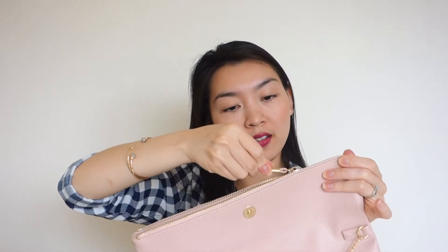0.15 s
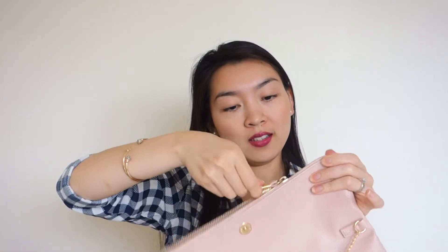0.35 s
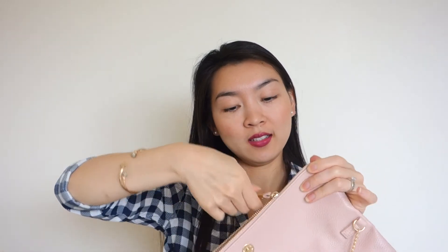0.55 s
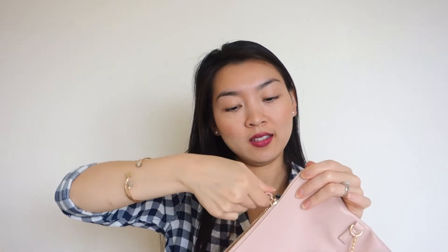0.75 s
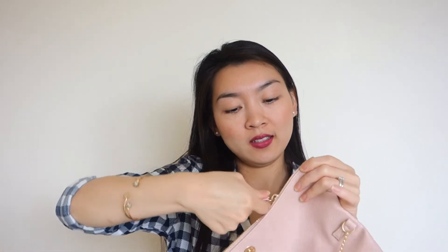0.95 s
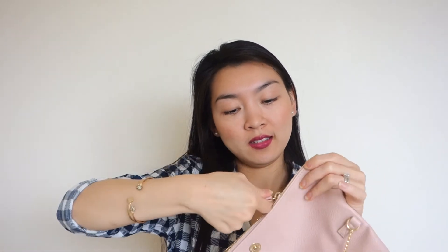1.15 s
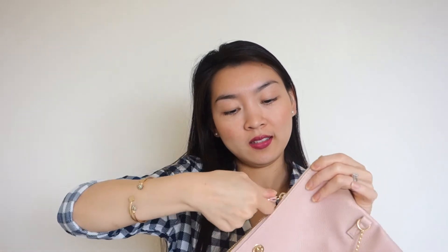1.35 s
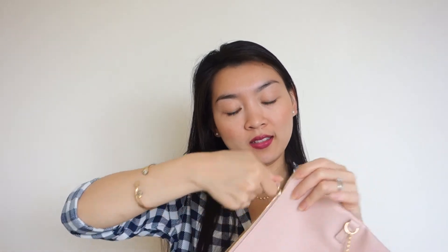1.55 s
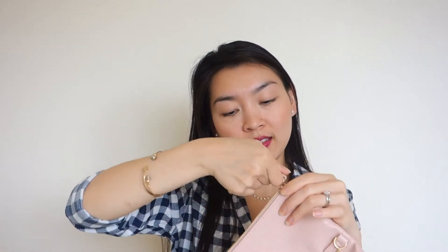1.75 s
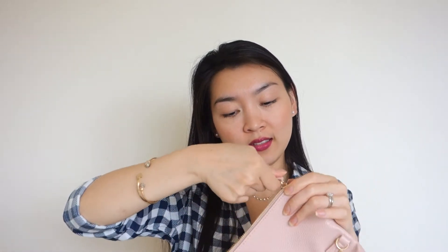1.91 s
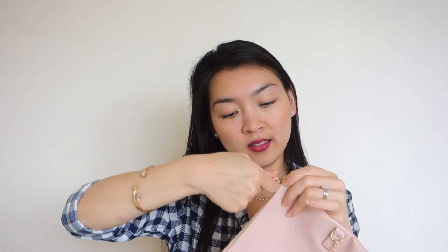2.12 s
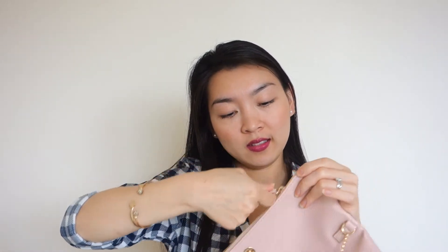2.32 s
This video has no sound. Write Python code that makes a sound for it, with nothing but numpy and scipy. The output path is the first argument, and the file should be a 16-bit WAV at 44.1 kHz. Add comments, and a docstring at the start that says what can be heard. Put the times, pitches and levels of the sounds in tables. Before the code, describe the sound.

Faint, halting scrapes of a small zipper being closed, with ticks and rubbing leather.

```python
"""A small metal zipper on a leather clutch bag is rubbed shut in short strokes, in a bare room.
From the start the teeth scrape and ring, while the leather rubs under the hand.
Soon the pull tab chinks; then, now and again, a tooth catches with a tick or the bag is nudged.
At about 1.5 s the hand bears down and the hollow bag rumbles.
Near the end it bears down again, and a panel of the bag booms as it shifts."""
import sys
import numpy as np
from scipy import signal
from scipy.fft import rfft, irfft
from scipy.io import wavfile

SR = 44100
rng = np.random.default_rng(int(sys.argv[2]) if len(sys.argv) > 2 else 0)


def output_pcm(signal):
    """Save a mono or channel-first signal as 16-bit PCM at the path in sys.argv[1].

    Samples are clipped to [-1, 1] before scaling.
    """
    pcm = np.clip(np.atleast_2d(signal).T, -1, 1) * 32767
    wavfile.write(sys.argv[1], SR, np.round(pcm).astype(np.int16))


N = 104737
TIME = np.arange(N) / SR
PADDED = 2 ** 18  # samples, with spare space for filters to ring out
FREQS = np.maximum(np.arange(PADDED // 2 + 1) * SR / PADDED, 1)

# strokes of the zipper: time_s, scrape_db, treble_db
STROKES = [(0.0, -40, -48.5), (0.09, -47, -70), (0.12, -48, -74), (0.24, -45, -54.5), (0.28, -40.5, -59),
           (0.33, -43, -56.5), (0.34, -42.5, -72), (0.4, -39.5, -55), (0.45, -46.5, -72),
           (0.46, -45.5, -55), (0.57, -53, -72), (0.62, -55, -73), (0.7, -46.5, -62), (0.74, -51.5, -70),
           (0.85, -49.5, -62.5), (0.88, -45, -55.5), (0.9, -39, -48.5), (1.06, -50, -70),
           (1.08, -47.5, -64), (1.14, -53.5, -70), (1.23, -44.5, -60), (1.3, -43.5, -53.5),
           (1.35, -48, -74), (1.39, -52.5, -65), (1.42, -53.5, -66), (1.48, -41, -46.5),
           (1.53, -42.5, -45.5), (1.58, -42.5, -56), (1.62, -52, -54.5), (1.68, -48, -64),
           (1.75, -43.5, -58), (1.81, -50, -84), (1.87, -56, -73), (2.01, -56, -77), (2.05, -43.5, -56.5),
           (2.12, -42, -54.5), (2.23, -44.5, -58.5), (2.37, -53.5, -53.5)]
# tone of the scrape: pitch_hz, level_db
SCRAPE_TONE = [(200, -41.5), (500, -19), (1050, -8.5), (1450, -2), (2200, -1), (3000, 0.5), (3900, -4.5),
               (5000, -6), (6700, -7), (7800, -17), (10000, -24), (16000, -24)]
# tone of the bright bite on top of it: pitch_hz, level_db
BITE_TONE = [(1500, -24), (4000, 7.5), (7000, 8), (9000, 3.5), (11000, 0.5), (13000, -0.5), (16000, -9)]
# pitches at which the zipper rings: pitch_hz, width_hz, boost_db
ZIPPER_RINGS = [(1510, 62, 1), (1630, 15, 4.5), (1718, 14, 4), (2340, 27, 0), (2635, 20, 1.5),
                (2876, 26, 7.5), (3050, 18, -0.5), (3337, 45, 9.5), (3394, 31, 6.5), (4165, 60, 5),
                (4960, 79, 5.5), (5815, 34, 5), (6644, 110, 6), (8230, 89, 13)]
# how much the low part of the scrape stands out: time_s, boost_db
LOW_RASP = [(0, -1), (.17, 3.5), (.5, 0), (.75, -2.5), (1.0, 2), (1.25, -3), (1.8, 3.5), (2.1, -3.5),
            (2.3, 0)]
# light rubbing of the leather: time_s, level_db
RUBBING = [(0, -46), (.06, -58), (.14, -61.5), (.25, -60.5), (.42, -57), (.49, -56), (.58, -57.5),
           (.71, -67), (.75, -63), (.83, -57), (.87, -58), (.96, -55), (1.05, -63.5), (1.17, -63),
           (1.3, -66.5), (1.4, -63), (1.52, -44.5), (1.68, -54), (1.79, -58), (1.9, -67.5), (2.01, -65.5),
           (2.105, -60), (2.125, -53), (2.23, -52.5), (2.37, -41.5)]
# tone of rubbed leather: pitch_hz, level_db
LEATHER_TONE = [(50, -47), (130, -24.5), (200, -21), (300, -13), (450, -7.5), (650, 1), (850, 0.5),
                (1200, -2.5), (1700, 0.5), (2500, -5.5), (5000, -23.5), (12000, -72)]
# pitches at which the bag rings: pitch_hz, width_hz, boost_db
BAG_RINGS = [(290, 14, 7), (426, 12, 3), (522, 12, 5), (552, 12, 1), (603, 12, 1), (787, 10, 2),
             (1144, 10, 0), (1185, 10, 1)]
# the pull tab chinks: start_s, level_db, pitch_hz
CHINKS = [(0.051, -41.5, 4220), (.085, -38.5, 3340), (.448, -41.5, 3254), (.893, -40, 3368),
          (1.285, -46.5, 3395), (1.365, -58, 12500), (1.645, -42.5, 3310)]
# a tooth catches: start_s, level_db
TICKS = [(.342, -31.5), (.372, -35.5), (.461, -40.5), (.872, -32), (.879, -39), (1.072, -42), (1.251, -40),
         (1.529, -31.5), (1.603, -34.5), (2.121, -40), (2.204, -37.5)]
# the bag is nudged: start_s, level_db
NUDGES = [(.528, -44.5), (.746, -42.5), (.80, -47.5), (.864, -40.5), (1.468, -37), (1.519, -31.5),
          (1.539, -30), (2.120, -42.5)]
# tone of the hollow bag: pitch_hz, level_db
HOLLOW_TONE = [(50, -45), (130, -25.5), (200, -21.5), (290, -10), (350, -8), (430, -3.5), (550, -5.5),
               (750, -1), (1100, -7), (2000, -16.5), (5000, -18), (12000, -56)]
# the hand bears down: peak_s, level_db, rise_db_per_s, fall_db_per_s
PRESSES = [(1.515, -36.5, 250, 164), (2.3, -44, 205, 5)]
# a panel of the bag shifts: peak_s, level_db, rise_db_per_s, fall_db_per_s
PANEL_SHIFTS = [(2.32, -54.5, 330, 5)]
# tone of the room's hiss: pitch_hz, level_db
HISS_TONE = [(20, -10.5), (60, -11.5), (150, -14), (500, 2), (2000, -4.5), (16000, -26)]
# how wide the sound spreads: pitch_hz, side_minus_middle_db
STEREO_WIDTH = [(120, -23), (350, -32), (700, -12.5), (1400, -10), (2800, -8), (5600, -4), (10000, -1),
                (15000, -2.5)]
# balance of the two microphones: pitch_hz, left_minus_right_db
MIC_BALANCE = [(500, 0.5), (2800, -0.5), (5600, -1.3), (10000, -1), (14000, -5)]


def from_db(db):
    """Turn decibels into a gain to multiply by."""
    return 10 ** (np.asarray(db) / 20)


def unit_level(x):
    """Scale a sound to an average (RMS) level of 1."""
    return x / np.sqrt(np.mean(x ** 2) + 1e-20)


def curves(rows):
    """Join a table's points with straight lines, one curve per column after the time."""
    times_s, *columns = np.transpose(rows)
    return [np.interp(TIME, times_s, column) for column in columns]


def tone(points, rings=()):
    """Gain at each pitch: a broad slope with narrow ringing peaks on it."""
    hz, db = np.transpose(points)
    slope = from_db(np.interp(np.log(FREQS), np.log(hz), db))
    peaks = sum(from_db(boost) ** 2 / (1 + (2 * (FREQS - pitch) / width) ** 2)
                for pitch, width, boost in rings)
    return slope * np.sqrt(1 + 2 * peaks)


def filtered(x, gain):
    """Give a sound a tone, so that ringing comes only after each hit (minimum phase)."""
    cepstrum = irfft(np.log(gain))
    cepstrum[1:PADDED // 2] *= 2
    cepstrum[PADDED // 2 + 1:] = 0
    return irfft(rfft(x, PADDED) * np.exp(rfft(cepstrum)))[..., :N]


def resonate(x, hz, width_hz):
    """Let a sound ring at one pitch, with a gain of 1 there."""
    r = np.exp(-np.pi * width_hz / SR)
    feedback = [1, -2 * r * np.cos(2 * np.pi * hz / SR), r * r]
    return signal.lfilter(np.array([1, 0, -1]) * (1 - r * r) / 2, feedback, x)


def drift(rate_hz):
    """A slow random wobble, about 1 in size."""
    smooth = rfft(rng.standard_normal(PADDED)) / (1 + (FREQS / rate_hz) ** 2)
    return unit_level(irfft(smooth)[:N])


def contacts(per_s, spread_db):
    """Tiny random hits, mostly small, a few large."""
    sizes = from_db(spread_db * np.minimum(rng.exponential(1, N), 4))
    return sizes * rng.choice([-1, 1], N) * (rng.random(N) < per_s / SR)


def knocks(rows, decay_s, gain):
    """Short bursts of noise that ring through an object, each peaking near its own level."""
    bursts = np.zeros(N)
    for start_s, db in rows:
        age = np.maximum(TIME - start_s, 0)
        bursts += from_db(db) * (TIME >= start_s) * np.exp(-age / decay_s) * rng.standard_normal(N)
    one_knock = filtered(rng.standard_normal(N) * np.exp(-TIME / decay_s), gain)
    return filtered(bursts, gain) / np.abs(one_knock).max()


def swells(rows):
    """A gain that rises to each peak and falls away."""
    return sum(from_db(db + np.minimum(rise * (TIME - peak_s), fall * (peak_s - TIME)))
               for peak_s, db, rise, fall in rows)


def zipper_scrape(teeth_per_s=208, pulse_db=1.3, ring_db=-1.5, flicker_db=2):
    """Tiny hits pulse as teeth pass; rings swell and fade with the grip; firm strokes add bite."""
    scrape_db, treble_db = curves(STROKES)
    low_db, = curves(LOW_RASP)
    teeth_passed = np.cumsum(teeth_per_s * np.exp(0.2 * drift(rate_hz=30))) / SR
    pulse = from_db(pulse_db * np.cos(2 * np.pi * teeth_passed))
    hits = [pulse * contacts(per_s=9000, spread_db=1.5) for _ in range(2)]
    rasp, ring_drive = (unit_level(filtered(x, tone(SCRAPE_TONE))) for x in hits)
    rings = np.zeros(N)
    for hz, width_hz, boost_db in ZIPPER_RINGS:
        grip = from_db(ring_db + boost_db + flicker_db * drift(rate_hz=13))
        rings += resonate(ring_drive * grip, hz, width_hz)
    scrape = unit_level(rasp + rings)
    scrape += (from_db(low_db) - 1) * resonate(scrape, hz=1590, width_hz=300)
    bite = unit_level(filtered(pulse * contacts(per_s=8000, spread_db=2.5), tone(BITE_TONE)))
    return from_db(scrape_db - 1) * scrape + from_db(treble_db + 4.5) * bite


def leather_rub():
    """The leather sticks and slips under the hand."""
    rub_db, = curves(RUBBING)
    slips = contacts(per_s=2600, spread_db=0.5)
    return from_db(rub_db - 0.5) * unit_level(filtered(slips, tone(LEATHER_TONE, BAG_RINGS)))


def tab_chinks(rise_s=0.00091, ring_s=0.099):
    """The small metal tab is tapped and rings briefly, damped by the fingers."""
    out = np.zeros(N)
    for start_s, db, hz in CHINKS:
        age = np.maximum(TIME - start_s, 0)
        loudness = from_db(db - 60 * age / ring_s) * (1 - np.exp(-age / rise_s))
        out += loudness * np.sin(2 * np.pi * hz * age)
    return out


def tooth_ticks():
    """A tooth catches and sets the zipper ringing."""
    metal = tone(SCRAPE_TONE, ZIPPER_RINGS) + 0.92 * tone(BITE_TONE)
    return knocks(TICKS, decay_s=0.012, gain=metal)


def bag_nudges():
    """Small bumps sound both the hollow bag and its leather skin."""
    body_and_skin = tone(HOLLOW_TONE, BAG_RINGS) + 0.83 * tone(LEATHER_TONE, BAG_RINGS)
    return knocks(NUDGES, decay_s=0.0024, gain=body_and_skin)


def bag_rumble():
    """Pressed harder, the slipping leather shakes the hollow bag."""
    slips = contacts(per_s=2600, spread_db=1.4)
    return swells(PRESSES) * unit_level(filtered(slips, tone(HOLLOW_TONE, BAG_RINGS)))


def panel_boom(pitch_hz=182, width_hz=26):
    """A panel of the bag booms around one low pitch as it is shifted."""
    panel = 1 / (1 + (2 * (FREQS - pitch_hz) / width_hz) ** 2)
    return swells(PANEL_SHIFTS) * unit_level(filtered(rng.standard_normal(N), panel))


def room_echo(x, delay_s=0.004, fade_s=0.27, turns_per_s=0.902):
    """Echoes off bare walls, blending slowly between two patterns as the hands and bag move."""
    tails = rng.standard_normal((2, N)) * from_db(-60 * TIME / fade_s) * (TIME > delay_s)
    first, second = (signal.fftconvolve(x, tail / np.sqrt(np.sum(tail ** 2)))[:N] for tail in tails)
    angle = 2 * np.pi * turns_per_s * TIME
    return np.cos(angle) * first + np.sin(angle) * second


def scene(echo_db=-5.5, hiss_db=-68):
    """The bag is straight ahead; echoes widen the treble; faint room hiss lies below."""
    direct = zipper_scrape() + tooth_ticks() + tab_chinks()
    direct += leather_rub() + bag_rumble() + panel_boom() + bag_nudges()
    middle = direct + from_db(echo_db) * room_echo(direct)
    middle_gain = np.sqrt(1 + from_db(echo_db) ** 2)
    side = middle_gain * filtered(room_echo(direct), tone(STEREO_WIDTH))
    hiss = from_db(hiss_db) * unit_level(filtered(rng.standard_normal((2, N)), tone(HISS_TONE)))
    return np.array([middle + side, middle - side]) + hiss


def record(dry, cutoff_hz=15780):
    """The right microphone is a little brighter; the highest treble is cut off."""
    left_gain = np.sqrt(tone(MIC_BALANCE))
    treble_cut = 1 / np.sqrt(1 + (FREQS / cutoff_hz) ** 300)
    return irfft(rfft(dry, PADDED) * np.array([left_gain, 1 / left_gain]) * treble_cut)[:, :N]


dry = scene()
out = record(dry)
output_pcm(out)
```